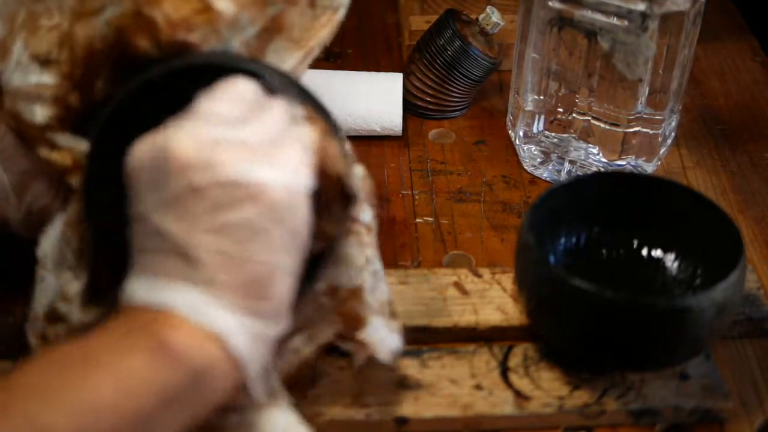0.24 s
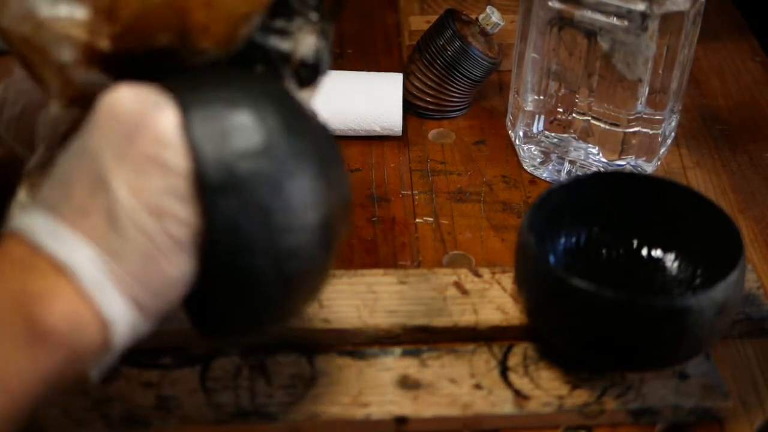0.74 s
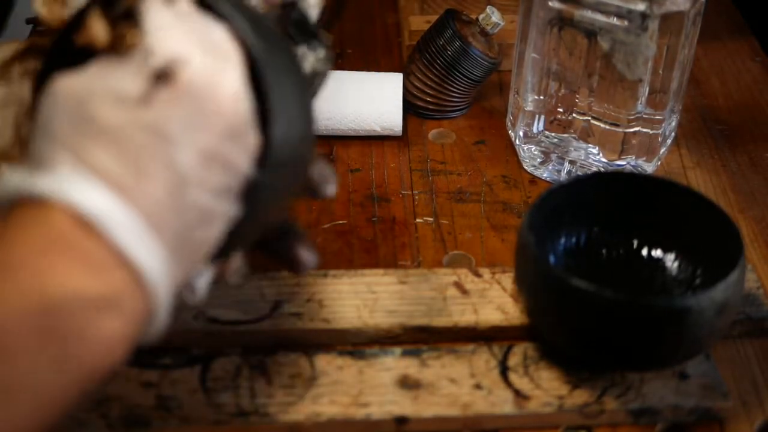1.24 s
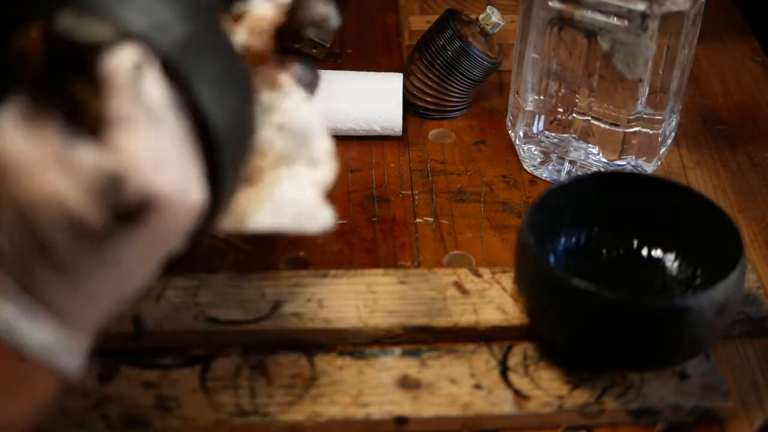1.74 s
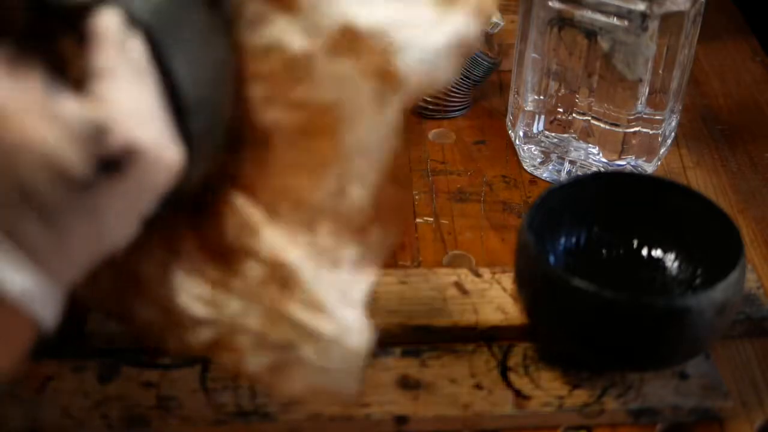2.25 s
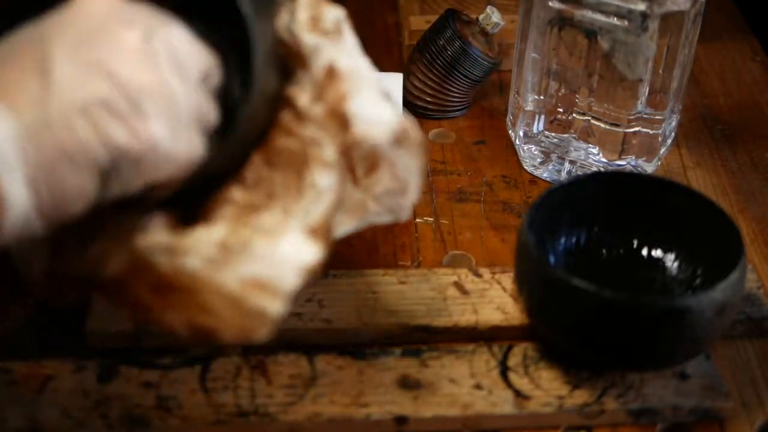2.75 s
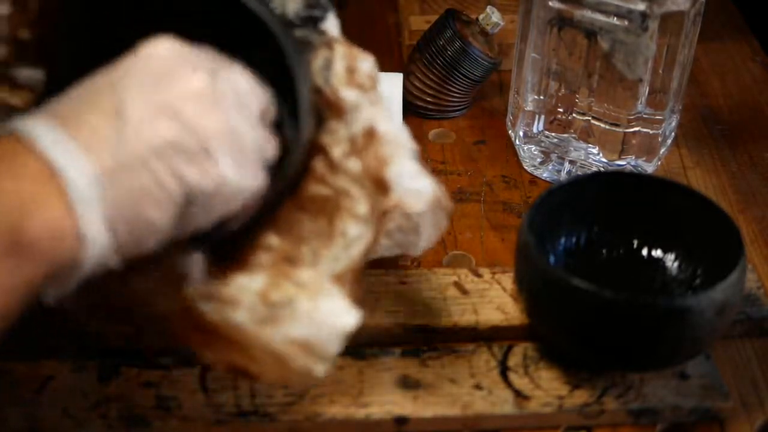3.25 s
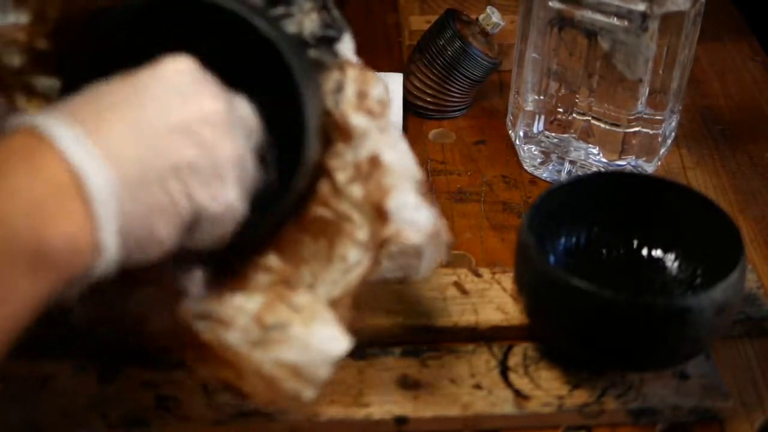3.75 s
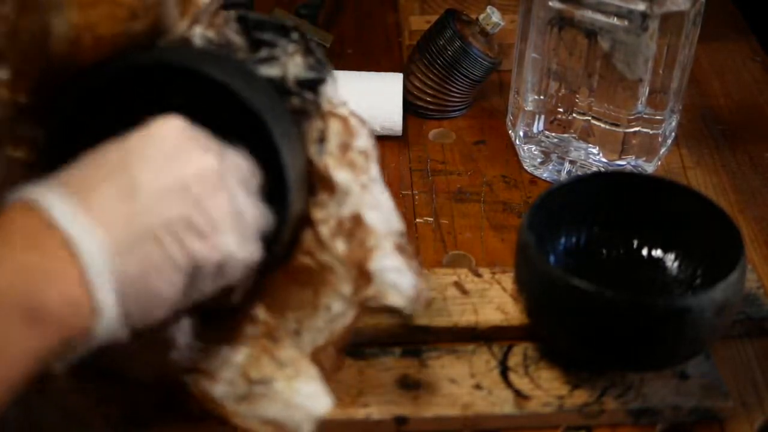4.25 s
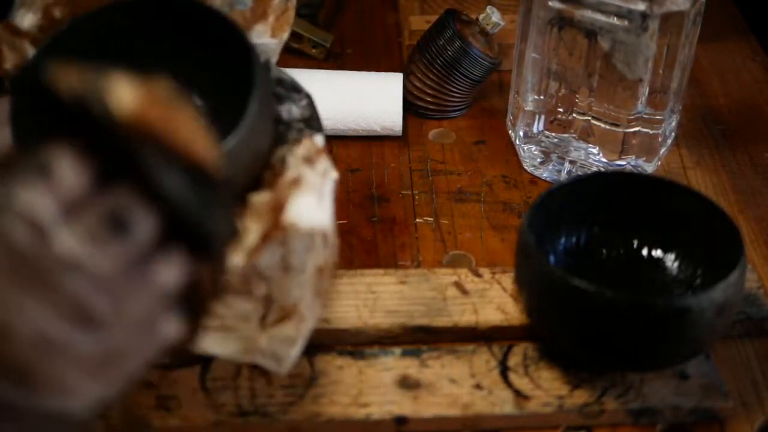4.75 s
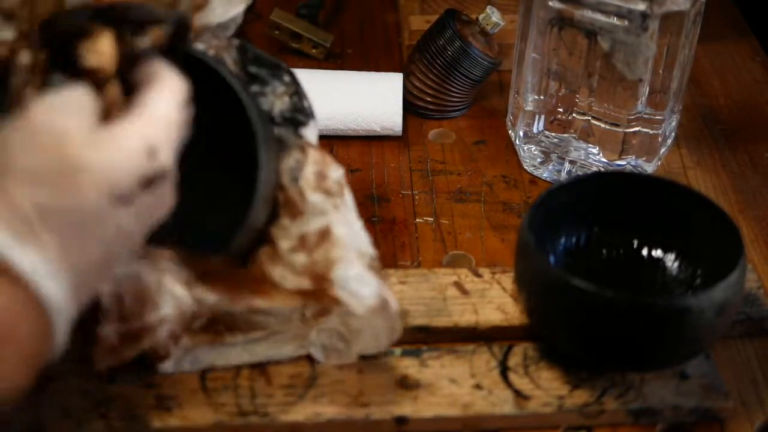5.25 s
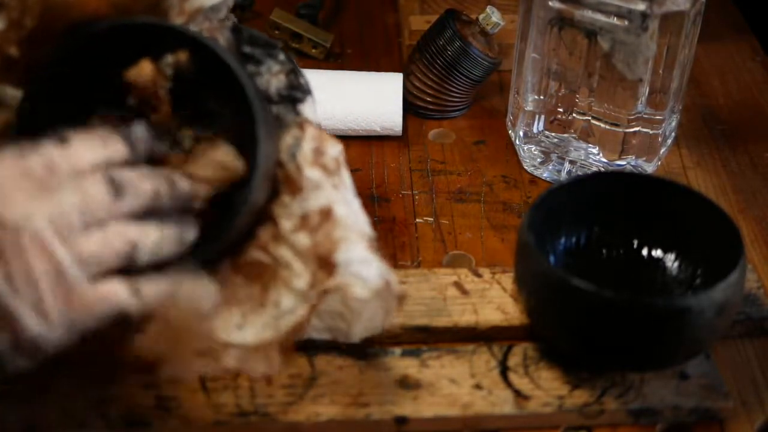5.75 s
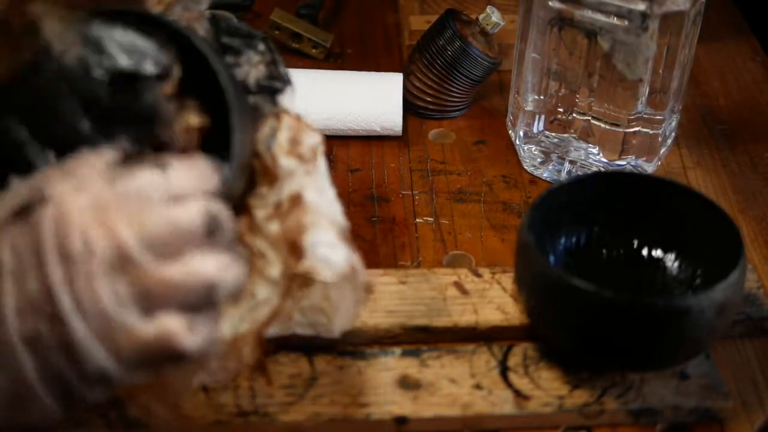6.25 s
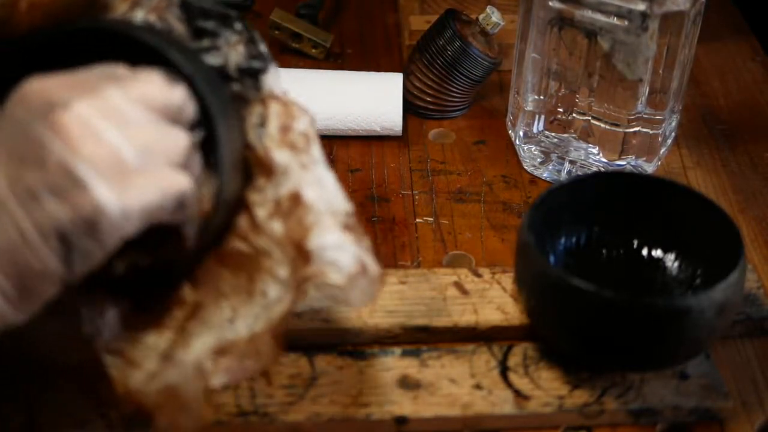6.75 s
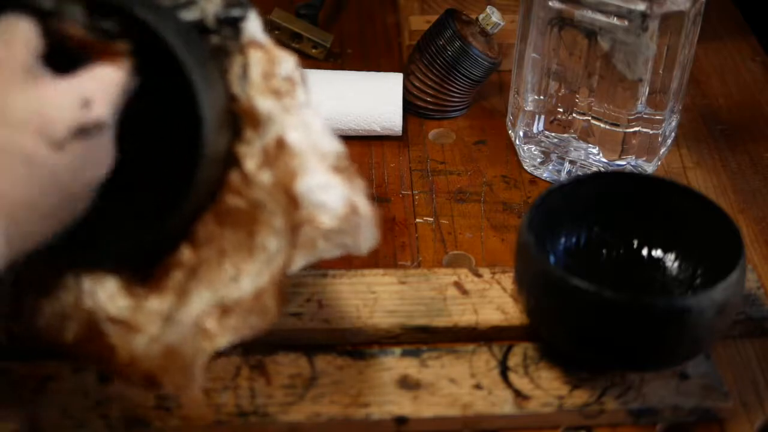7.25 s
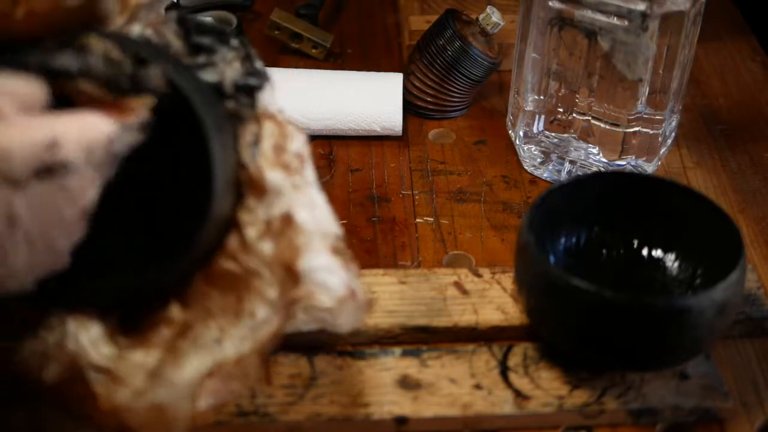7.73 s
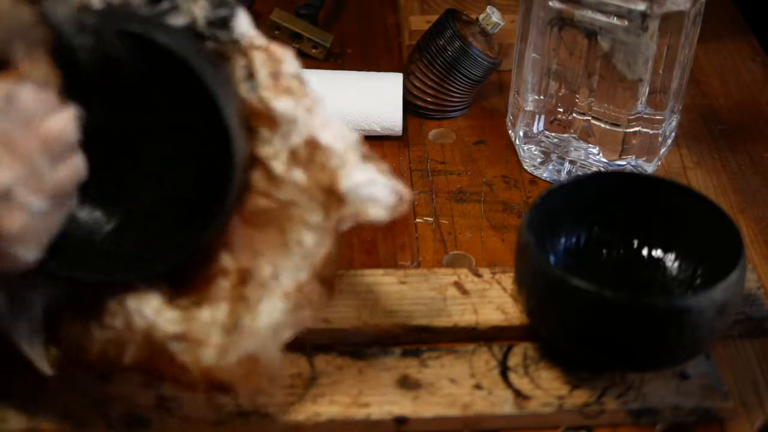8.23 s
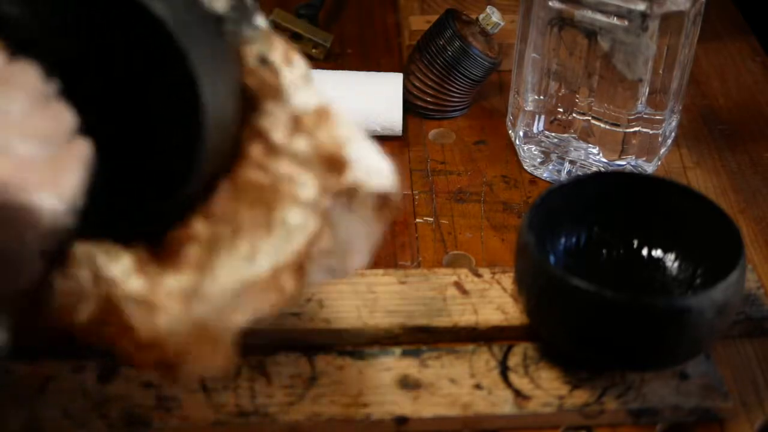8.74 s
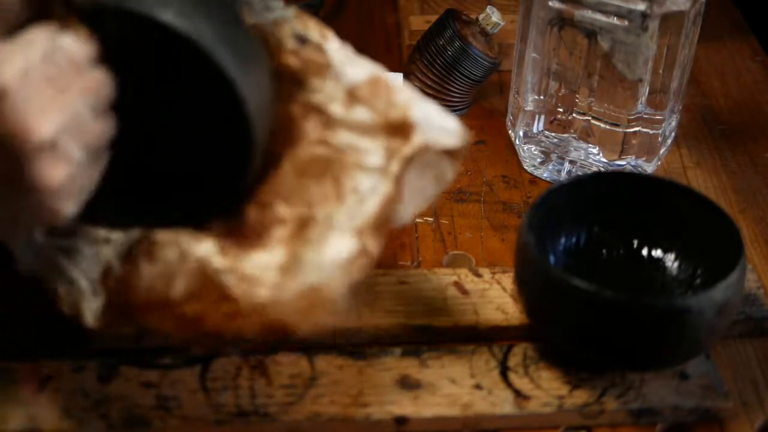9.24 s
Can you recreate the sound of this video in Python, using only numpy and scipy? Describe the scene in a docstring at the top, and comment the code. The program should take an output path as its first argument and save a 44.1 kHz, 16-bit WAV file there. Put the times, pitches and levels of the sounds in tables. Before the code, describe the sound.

Crumpled paper scrubs a lacquered wooden bowl up close in quick dry strokes, with a hard knock, small snaps and faint room air.

```python
"""In a small workshop, a wad of crumpled paper scrubs a lacquered wooden bowl close to a stereo microphone.
Fibres catch and slip in a dense fizz of random clicks; pressed harder, they drive resonances of the bowl.
The bowl knocks, drags and groans on the bench as it is turned in the hand; creases snap, lacquer squeaks.
A loose sheet flaps softly under it. Short reflections, ventilation noise and a faint hum lie behind."""
import sys
import numpy as np
from scipy import signal
from scipy.fft import rfft, irfft, next_fast_len
from scipy.io import wavfile

SR = 44100
rng = np.random.default_rng(int(sys.argv[2]) if len(sys.argv) > 2 else 0)


def log_audio(samples):
    """Write samples as a 16-bit WAV file to the path given in sys.argv[1]."""
    # one column per channel
    frames = np.atleast_2d(samples).T
    # limit to full scale, then quantise
    limited = np.clip(frames, -1, 1)
    pcm = np.round(limited * 32767).astype(np.int16)
    wavfile.write(sys.argv[1], SR, pcm)


N = 418507
TIME = np.arange(N) / SR


def amp(db):
    """Decibels to gain."""
    return 10 ** (np.asarray(db) / 20)


def unit(x):
    """Scales to an rms of one."""
    return x / np.sqrt(np.mean(x ** 2) + 1e-20)


def colour(x, points):
    """Filters by a spectrum of (hz, db) points, joined along log frequency."""
    hz, db = np.transpose(points)
    size = next_fast_len(N + 4096)
    bins = np.fft.rfftfreq(size, 1 / SR)
    gain = amp(np.interp(np.log(bins + 1), np.log(hz), db))
    return irfft(rfft(x, size) * gain, size)[..., :N]


def wander(per_s):
    """Smooth chance of rms one, through per_s random points a second."""
    knots = rng.standard_normal(N // 32)
    return unit(np.interp(TIME * per_s, np.arange(len(knots)), knots))


def resonate(x, hz, width):
    """A resonance of gain one that follows hz: shift down to zero, smooth, shift back up."""
    turn = np.exp(2j * np.pi * np.cumsum(hz * np.ones(len(x))) / SR)
    r = np.exp(-np.pi * width / SR)
    smooth = signal.lfilter([1 - r], [1, -r], x / turn + 1e-18)
    return 2 * (turn * smooth).real


def band(x, hz, width):
    """A fixed resonance of gain one."""
    return signal.lfilter(*signal.iirpeak(hz, hz / width, SR), x)


def add(mix, s, sound):
    """Mixes a sound in at time s."""
    part = mix[round(s * SR):][:len(sound)]
    part += sound[:len(part)]


def slips(per_s, spread_db):
    """Tiny releases of fibres: random moments, mostly small, a few large."""
    moment, depth, side = rng.random((N // 2, 3))[:int(per_s * N / SR)].T
    size = amp(spread_db * np.minimum(-np.log(1 - depth), 5)) * np.sign(side - .5)
    return unit(np.bincount((moment * N).astype(int), size, N))


def gesture(start, length, rise_s, fall_s, swell_db=0):
    """A movement of the hand: it gathers speed, swells or sags steadily, and comes to rest."""
    out = np.zeros(N)
    on = slice(*np.searchsorted(TIME, [start, start + length]))
    t = TIME[on] - start
    rise, fall = np.sin(np.pi / 2 * np.minimum([t / rise_s, (length - t) / fall_s], 1))
    out[on] = rise * fall ** 2 * amp(swell_db * (t / length - .5))
    return out


# strokes of the hand: start_s, length_s, edge_s (speeding up or stopping), fizz_db (sliding fibres),
# drive_db (into the bowl), swell_db (start to end), hollow_hz (resonance under the hand);
# both levels are taken before the balance in scrub
HAND_STROKES = [(-0.031, 0.32, 0.094, -30, -33, -14.5, 2950), (0.252, 0.22, 0.074, -23, -30.5, 5.0, 1590),
                (0.421, 0.11, 0.023, -32, -31, -14.0, 2000.0), (0.654, 0.3, 0.09, -32, -36.5, 18.5, 1830),
                (0.823, 0.4, 0.15, -32, -38, -4, 1990), (1.138, 0.15, 0.093, -39.5, -45, 6, 2000.0),
                (1.27, 0.25, 0.08, -37, -39, 5.5, 1720), (1.486, 0.14, 0.11, -36.5, -39, 6, 1300),
                (1.698, 0.69, 0.18, -44, -48.5, -9.5, 2050.0),
                (2.196, 0.32, 0.083, -34.5, -39, -19.5, 1950), (2.315, 0.43, 0.15, -33, -41, 27.5, 2080),
                (2.667, 0.54, 0.069, -27, -34, 0.3, 1940), (3.144, 1, 0.079, -28.5, -36.5, -3, 2080),
                (4.133, 0.3, 0.053, -29.5, -36.5, -5.5, 2300), (4.75, 0.31, 0.13, -43.5, -43.5, 17, 1670),
                (4.95, 0.36, 0.15, -27.9, -31.5, 12, 1870), (5.318, 0.24, 0.067, -36, -42, -15.5, 1850.0),
                (5.712, 0.18, 0.11, -32, -37.5, 2, 1810), (5.842, 0.33, 0.044, -32, -42, -11.5, 1640),
                (6.011, 0.34, 0.076, -36, -47.5, 12.5, 1200.0),
                (6.41, 0.23, 0.049, -33.6, -35.5, 3.6, 1660),
                (6.601, 0.326, 0.055, -26.5, -33.5, -3.5, 1890),
                (6.841, 0.31, 0.079, -25.5, -28.5, -15.5, 2120), (7.165, 0.29, 0.079, -26, -30, 0, 2190),
                (7.49, 0.26, 0.19, -22.5, -25, -12.5, 2060), (7.695, 0.38, 0.12, -37.5, -41.5, -16.5, 1670),
                (7.767, 0.11, 0.057, -34, -52, -8.8, 1900.0), (7.969, 0.202, 0.07, -28, -32.5, 10, 1370.0),
                (8.116, 0.12, 0.065, -24, -29, -7, 1450.0), (8.213, 0.3, 0.14, -31, -39, -1, 1940),
                (8.46, 0.18, 0.063, -26, -34, 6.5, 1530), (8.679, 0.2, 0.12, -29.5, -37.5, -16, 1700.0),
                (8.823, 0.18, 0.12, -22.9, -29.8, -8, 1770), (8.998, 0.15, 0.073, -30, -41.5, 2, 1300.0),
                (9.124, 0.161, 0.108, -22, -29, 23.5, 1280), (9.324, 0.15, 0.089, -28, -39, -9.5, 1590),
                (9.458, 0.144, 0.072, -34.5, -39, -4.7, 1450.0)]
# between strokes the wad keeps creeping on the lacquer, least while the grip changes: time_s, level_db
CREEPING = [(0, -41.5), (1.65, -46.5), (4.42, -42.5), (4.65, -57), (4.9, -44), (5.55, -44), (5.7, -48.5),
            (6.38, -45), (7.1, -47), (8.66, -45), (9.4, -48)]
CREEP_DRIVE_DB, CREEP_HZ = -6.5, 1670  # drive relative to the creep level, hollow resonance
# in the long rub the hand circles inside the bowl and bears down once a turn
CIRCLING_S, CIRCLING_LENGTH_S, CIRCLING_EDGE_S, TURN_S = 2.705, 1.45, .08, .247
BEAR_DOWN_DB = 1.8  # pressure swings this far up and down


def hand(uneven_db=0.75, uneven_per_s=28):
    """Powers of strokes add up to sliding speed and pressure; the strongest weighs most in the hollow."""
    creep = amp(np.interp(TIME, *np.transpose(CREEPING)))
    slide, press = creep ** 2, (amp(CREEP_DRIVE_DB) * creep) ** 2
    tuning = press * CREEP_HZ
    for s, length, edge_s, fizz_db, drive_db, swell_db, hz in HAND_STROKES:
        power = gesture(s, length, edge_s, edge_s, swell_db) ** 2
        slide += amp(fizz_db) ** 2 * power
        press += amp(drive_db) ** 2 * power
        tuning += amp(drive_db) ** 2 * hz * power
    circling = gesture(CIRCLING_S, CIRCLING_LENGTH_S, CIRCLING_EDGE_S, CIRCLING_EDGE_S)
    lean = amp(-BEAR_DOWN_DB * circling * np.cos(2 * np.pi * (TIME - CIRCLING_S) / TURN_S))
    uneven = amp(uneven_db * wander(uneven_per_s))
    return np.sqrt(slide) * uneven, np.sqrt(press) * uneven * lean, tuning / press


# fizz of the paper itself, relative spectrum: pitch_hz, level_db
PAPER_SPECTRUM = [(60, -39), (330, -31), (900, -3.5), (2000, -11), (3500, -1), (5000, -1.5), (7800, -1.5),
                  (9300, 0.5), (10700, 2.5), (12000, -2.5), (13500, -8), (15300, -17.5)]
# the bowl damped by the rubbing hand: pitch_hz, width_hz, level_db (relative, before the focus on the hollow)
WALL_MODES = [(735, 50, -9), (925, 65, -2), (1056, 75, 2), (1213, 80, -3), (1375, 110, 0), (1780, 220, -1),
              (2300, 300, -4), (2750, 300, -5), (3820, 300, -1)]
# how well the bowl radiates: pitch_hz, level_db
BOWL_RADIATION = [(40, -55), (150, -27), (550, -16), (800, -7), (1100, -1), (1500, 0), (4500, 0),
                  (9000, -8)]


def scrub(slide, press, hollow_hz, fizz_db=1, wall_db=-2, hollow_db=-5, hollow_width=1000,
          focus_db=6, crackle_db=-8, judder_db=0.53, fold_db=1.0):
    """Slips radiate from the paper itself and through the wall and hollow of the bowl."""
    # folds catch and let go
    grip = amp(judder_db * wander(per_s=560) + fold_db * wander(per_s=55))
    fizz = unit(colour(slips(per_s=18000, spread_db=1.5) * grip, PAPER_SPECTRUM))

    contact = slips(per_s=5000, spread_db=2.5) * grip
    wall = np.zeros(N)
    for hz, width, db in WALL_MODES:
        # modes near the resonance of the hollow speak loudest
        focus = amp(db - focus_db * np.log2(hz / hollow_hz) ** 2)
        wall += focus * band(contact, hz, width)

    air = slips(per_s=4000, spread_db=4.5) * grip
    hollow = resonate(resonate(air, hollow_hz, hollow_width), hollow_hz, hollow_width)
    bowl = colour(amp(wall_db) * unit(wall) + amp(hollow_db) * unit(hollow), BOWL_RADIATION)
    paper = amp(fizz_db) * fizz + amp(crackle_db) * crackle()
    return slide * paper + press * bowl


def crackle(count=20):
    """Stiff facets of the wad chatter unevenly, each ringing briefly at its own pitch."""
    pitches = np.geomspace(1900, 5600, count) * rng.uniform(.98, 1.02, count)
    total = np.zeros(N)
    for hz in pitches:
        chatter = slips(per_s=250, spread_db=2) * np.exp(.55 * wander(per_s=22))
        total += unit(band(chatter, hz, hz / 30))
    return unit(total)


# knocks on the bowl, before the room: start_s, peak_db, top_hz (hardness)
BOWL_KNOCKS = [(0.443, -6, 6000), (0.4557, -14, 4500), (.4675, -20, 3000), (1.215, -42, 280),
               (1.329, -35, 278), (1.402, -39, 706), (1.426, -35, 1010), (1.63, -54, 303),
               (2.228, -31.5, 900), (8.717, -38.5, 710), (9.35, -42, 400)]
# the struck bowl: pitch_hz, level_db (relative), t60_s
BOWL_RING = [(120, -23, .17), (154, -17, .26), (210, -15, .15), (345, -14, .15), (716, -7, .05),
             (900, -2, .022), (1070, -4, .022), (1534, -9, .03), (1916, -8, .05), (2094, -2, .075),
             (2700, -4, .02), (3700, -8, .025)]


def knocks(crack=.4, crack_s=0.0015):
    """Each blow is a short crack and the ring of the wood; padded blows lose their treble."""
    out, t = np.zeros(N), np.arange(SR // 2) / SR
    ring = sum(amp(db - 60 * t / t60) * np.sin(2 * np.pi * hz * t) for hz, db, t60 in BOWL_RING)
    for s, db, top_hz in BOWL_KNOCKS:
        blow = ring / abs(ring).max() + crack * rng.standard_normal(len(t)) * np.exp(-t / crack_s)
        blow = signal.sosfilt(signal.butter(3, [140, top_hz], "band", fs=SR, output="sos"), blow)
        add(out, s, amp(db) * blow / abs(blow).max())
    return out


# the bowl drags in the hand that holds it: start_s, length_s, level_db (before level_db and tone in drags),
# swell_db, from_hz, to_hz
BOWL_DRAGS = [(0.311, 0.15, -28.5, 11, 730, 940), (1.316, .12, -39, 11, 486, 553),
              (1.423, 0.153, -37.5, 0, 660, 790), (5.89, 0.25, -34, -12, 1150, 820),
              (6.224, .11, -35, 0, 880, 810), (6.652, 0.16, -27, 1, 950, 1100),
              (6.92, .13, -19, -3, 1550, 1850), (7.57, 0.1, -22.5, 0, 1500, 1650),
              (7.998, 0.23, -24, 4, 1290, 1220), (9.033, 0.1, -32, 11, 830, 930),
              (9.138, 0.13, -26.5, 5, 1020, 1080)]
DRAG_EDGE_S = 0.029


def drags(level_db=-4, width=420):
    """The bowl shifts in its wrapping: coarse slips with a dull, gliding resonance."""
    out = np.zeros(N)
    coarse = slips(per_s=1200, spread_db=4.5)
    for s, length, db, swell_db, from_hz, to_hz in BOWL_DRAGS:
        speed = gesture(s, length, DRAG_EDGE_S, DRAG_EDGE_S, swell_db)
        on = speed > 0
        hz = np.linspace(from_hz, to_hz, on.sum())
        rub = resonate(resonate(coarse[on], hz, width), hz, width)
        out[on] += unit(rub) * amp(db + level_db) * speed[on]
    return colour(out, [(40, -45), (120, -6), (250, 9.5), (2000, -12.5)])


# creases that snap: start_s, peak_db (before level_db in snaps), pitch_hz
CREASE_SNAPS = [(1.515, -27, 790), (1.799, -26, 900), (4.737, -33, 620), (4.786, -31, 1500),
                (4.89, -20.5, 2900), (4.947, -20.5, 1100), (5.487, -17, 3720), (5.992, -26, 3700),
                (6.256, -18, 895), (8.704, -13, 5200)]


def snaps(level_db=-2, decay_s=0.0017):
    """Single creases of the paper buckle: brief noise bursts through a broad resonance."""
    out, t = np.zeros(N), np.arange(SR // 32) / SR
    for s, db, hz in CREASE_SNAPS:
        tick = band(rng.standard_normal(len(t)) * np.exp(-t / decay_s), hz, hz)
        add(out, s, amp(db + level_db) * tick / abs(tick).max())
    return out


# the bowl is pushed and judders on the bench: start_s, length_s, level_db (before level_db in rumbles)
BENCH_RUMBLES = [(.45, 0.11, -44), (1.193, .06, -51), (1.315, 0.089, -51), (1.615, 0.055, -38.5)]
RUMBLE_RISE_S, RUMBLE_FALL_S, RUMBLE_SWELL_DB = .02, .04, -3
# low modes of the bench: pitch_hz, width_hz, level_db (relative, before the tone in rumbles)
BENCH_MODES = [(85, 22, -11), (120, 20, -10), (155, 18, -16), (221, 19, 25)]


def rumbles(level_db=-4):
    """The bowl judders against the bench, which answers with its low modes."""
    judder = slips(per_s=300, spread_db=3)
    modes = sum(amp(db) * band(judder, hz, width) for hz, width, db in BENCH_MODES)
    bench = unit(colour(modes, [(35, -35), (80, -6), (260, 23), (700, -28)]))
    weight = np.zeros(N)
    for s, length, db in BENCH_RUMBLES:
        weight += amp(db) * gesture(s, length, RUMBLE_RISE_S, RUMBLE_FALL_S, RUMBLE_SWELL_DB)
    return amp(level_db) * bench * weight


# once the bowl slips regularly on the bench, in a short groan that sinks as it slows
GROAN_S, GROAN_LENGTH_S, GROAN_DB, GROAN_EDGE_S = 6.48, 0.146, -48.5, 0.024
GROAN_FROM_HZ, GROAN_TO_HZ, GROAN_SLOWING_S = 122, 73, .048  # falls towards to_hz with this time constant
# its partials: multiple, level_db (relative)
GROAN_HARMONICS = [(1, -15), (2, 0), (3, -5)]


def groan():
    """Stick and slip of the bowl on the bench, at a falling rate."""
    slowing = np.exp(-np.maximum(TIME - GROAN_S, 0) / GROAN_SLOWING_S)
    hz = GROAN_TO_HZ + (GROAN_FROM_HZ - GROAN_TO_HZ) * slowing
    turns = np.cumsum(hz * (1 + .03 * wander(per_s=100))) / SR
    tone = unit(sum(amp(db) * np.sin(2 * np.pi * k * turns) for k, db in GROAN_HARMONICS))
    return amp(GROAN_DB) * gesture(GROAN_S, GROAN_LENGTH_S, GROAN_EDGE_S, GROAN_EDGE_S) * tone


# the lacquer squeaks in two catches: start_s, length_s, level_db
SQUEAK_CATCHES = [(4.33, .1, -45), (4.39, .14, -46.5)]
SQUEAK_HZ, SQUEAK_EDGE_S = 1042, .04
# partials of the squeak: multiple of SQUEAK_HZ, level_db (relative)
SQUEAK_HARMONICS = [(2, -4), (3, -3), (4, -1), (5, 0)]


def squeak():
    """Stick and slip lock into an unsteady pitch as the stroke stops."""
    turns = np.cumsum(SQUEAK_HZ * (1 + .011 * wander(per_s=700))) / SR
    tone = unit(sum(amp(db) * np.sin(2 * np.pi * k * turns) for k, db in SQUEAK_HARMONICS))
    grip = sum(amp(db) * gesture(s, length, SQUEAK_EDGE_S, SQUEAK_EDGE_S) for s, length, db in SQUEAK_CATCHES)
    return grip * amp(2 * wander(per_s=200)) * tone


# the loose sheet under the bowl, relative spectrum: pitch_hz, level_db
SHEET_SPECTRUM = [(40, -34), (100, -30), (200, -7.5), (340, -1.5), (650, 1), (1100, 0), (3000, -52)]
# tugs at the loose sheet: start_s, length_s, level_db (before level_db in wrapping)
SHEET_TUGS = [(0.297, 0.15, -29), (0.768, 0.14, -36.5), (1.35, 0.092, -40.5), (2.206, 0.085, -33.5),
              (5.156, 0.13, -36.5), (8.02, .19, -43), (6.126, 0.19, -41.5), (8.5, 0.083, -36),
              (8.7, 0.11, -39)]
TUG_EDGE_S = 0.019


def wrapping(slide, level_db=-6, idle_db=-49, shaken_db=-14):
    """The loose sheet under the bowl flaps softly with every stroke, and harder when it is tugged."""
    tugs = sum(amp(db) * gesture(s, length, TUG_EDGE_S, TUG_EDGE_S) for s, length, db in SHEET_TUGS)
    movement = np.sqrt(amp(idle_db) ** 2 + (amp(shaken_db) * slide) ** 2 + tugs ** 2)
    rustle = unit(colour(slips(per_s=2500, spread_db=3.5), SHEET_SPECTRUM))
    return amp(level_db) * movement * rustle


# spectrum of the part that differs between the channels, nearly empty around 7.5 kHz: pitch_hz, level_db
SPREAD_SPECTRUM = [(100, 0), (300, 4), (600, 0.5), (1100, -4.5), (2500, -11), (4000, -13), (7500, -100),
                   (10000, -17.5), (12000, 2.5), (15000, -2.5)]


def room(x, t60=0.22, treble_t60=0.042, split_hz=3000):
    """Dense reflections from bench and walls, different at each ear; the treble dies first."""
    t = np.arange(SR // 3) / SR
    taps = rng.standard_normal((2, len(t))) * (t > .002)
    low = signal.sosfilt(signal.butter(2, split_hz, fs=SR, output="sos"), taps)
    high = signal.sosfilt(signal.butter(2, split_hz, "high", fs=SR, output="sos"), taps)
    slow, fast = amp(-60 * t / t60), amp(-60 * t / treble_t60)
    tail = low * slow / np.linalg.norm(slow) - high * fast / np.linalg.norm(fast)
    return colour(signal.fftconvolve(x[None], tail, axes=1)[:, :N], SPREAD_SPECTRUM)


# ventilation noise, relative spectrum: pitch_hz, level_db
AIR_SPECTRUM = [(25, -34), (60, -27), (100, -8), (160, -3), (400, 1), (700, 0), (1100, -4), (3000, -8),
                (7000, -33), (11000, -20), (15000, -38)]
AIR_DB = -47  # rms over both channels
# hum of the workshop: pitch_hz, level_db (rms, before hum_db in workshop)
HUM_TONES = [(366.1, -58), (489.9, -55), (656.8, -59), (855.9, -89)]


def workshop(hum_db=-4, waver=0.0061):
    """Diffuse ventilation noise with a few wavering tones."""
    air = amp(AIR_DB) * unit(colour(rng.standard_normal((2, N)), AIR_SPECTRUM))
    hum = np.zeros(N)
    for hz, db in HUM_TONES:
        turns = np.cumsum(hz * (1 + waver * wander(per_s=30))) / SR
        hum += amp(db + hum_db) * unit(np.sin(2 * np.pi * turns))
    return air + hum


def scene(left_db=0.42):
    """The work sits just left of centre, with its reflections, in front of the workshop air."""
    slide, press, hollow_hz = hand()
    paper = scrub(slide, press, hollow_hz) + snaps() + squeak() + wrapping(slide)
    bowl = knocks() + drags() + rumbles() + groan()
    direct = paper + bowl
    return (direct + room(direct)) * amp([[left_db], [-left_db]]) + workshop()


NOTCH_HZ, EDGE_HZ = 7900, 15450  # narrow notch, upper band limit


def record(dry, notch_width=130):
    """The recorder has one narrow notch in the treble and a band limit."""
    notched = dry - band(dry, NOTCH_HZ, notch_width)
    low_pass = signal.firwin(511, EDGE_HZ, window=("kaiser", 9), fs=SR)
    return signal.oaconvolve(notched, low_pass[None], "same")


dry = scene()
out = record(dry)
log_audio(out)
```